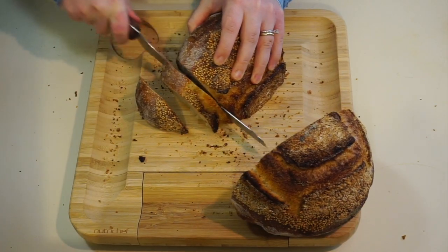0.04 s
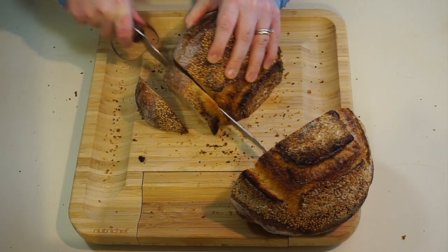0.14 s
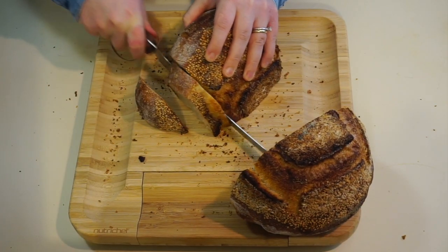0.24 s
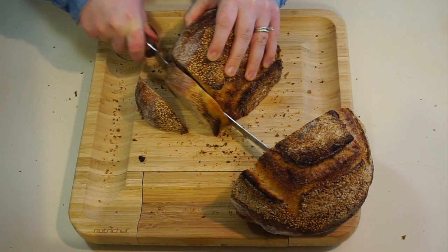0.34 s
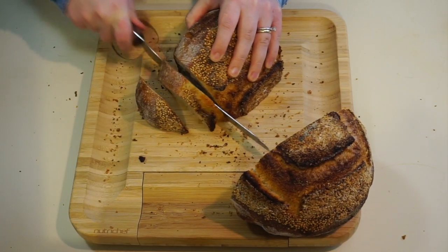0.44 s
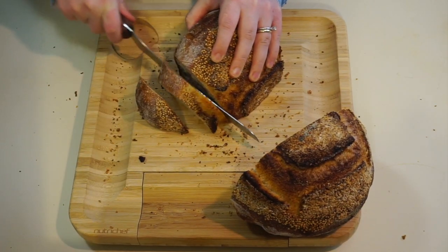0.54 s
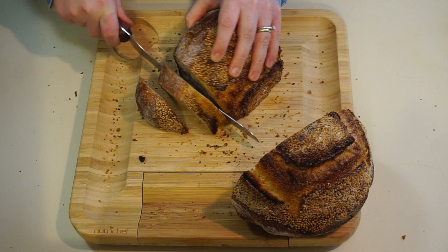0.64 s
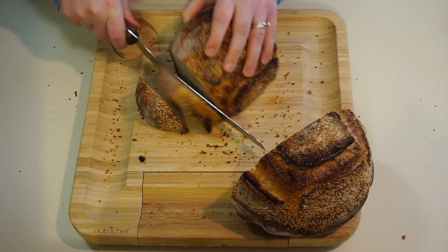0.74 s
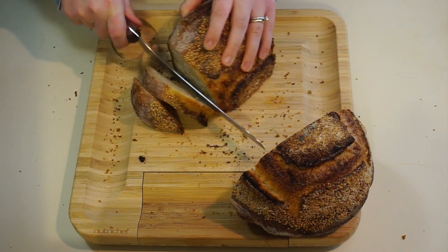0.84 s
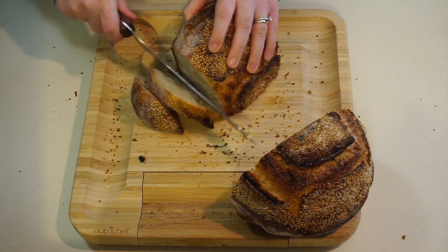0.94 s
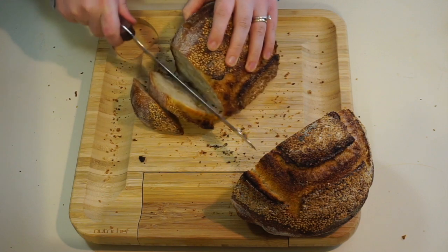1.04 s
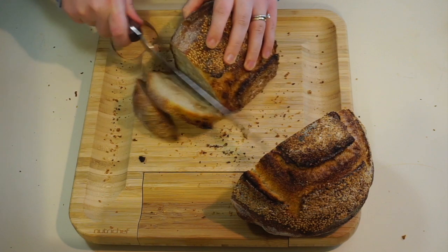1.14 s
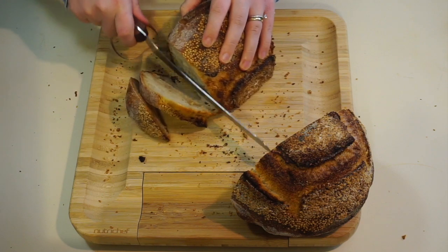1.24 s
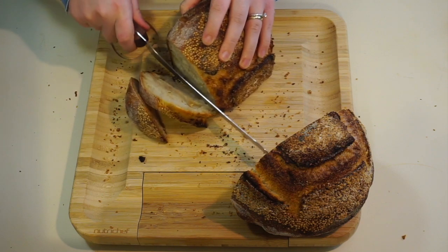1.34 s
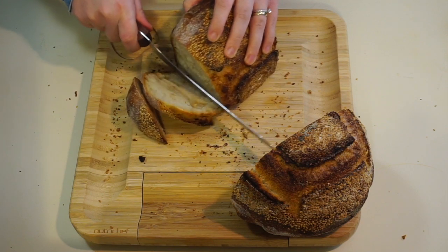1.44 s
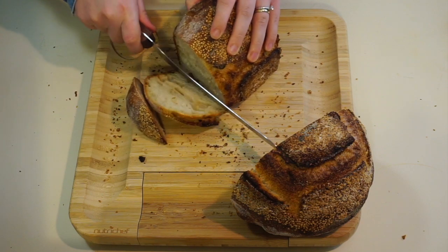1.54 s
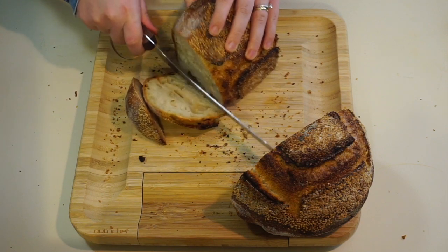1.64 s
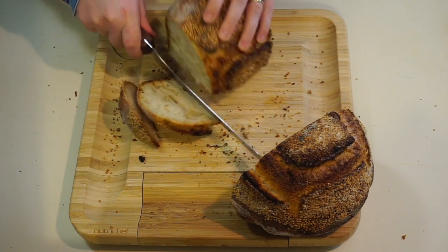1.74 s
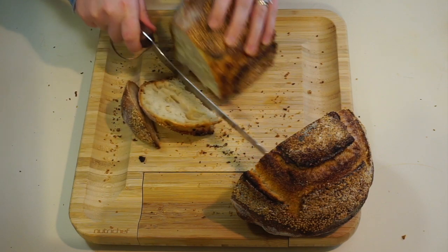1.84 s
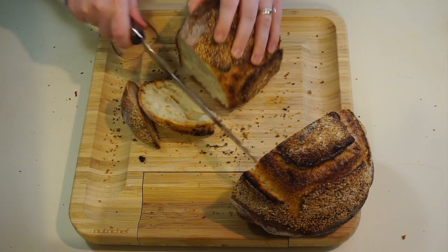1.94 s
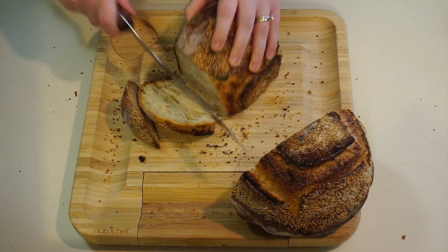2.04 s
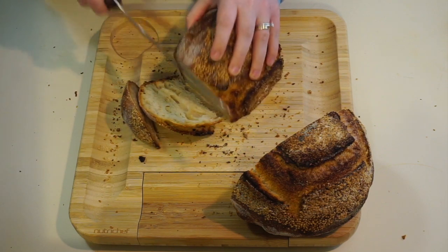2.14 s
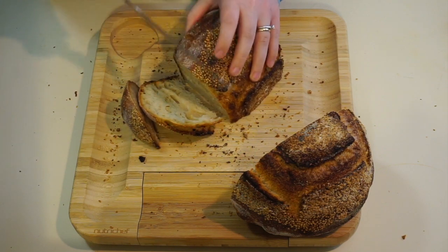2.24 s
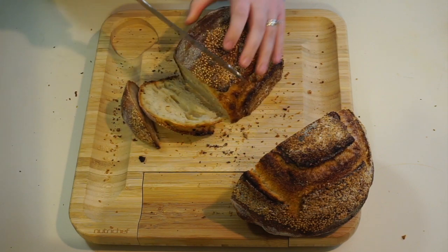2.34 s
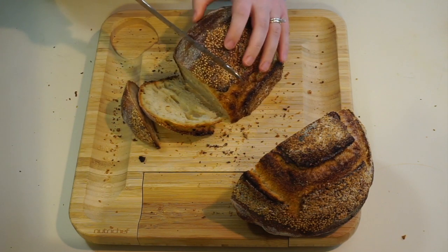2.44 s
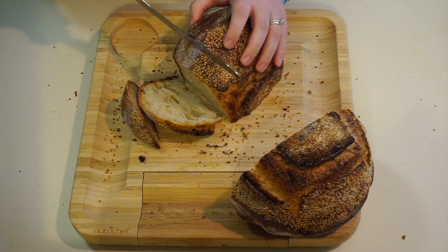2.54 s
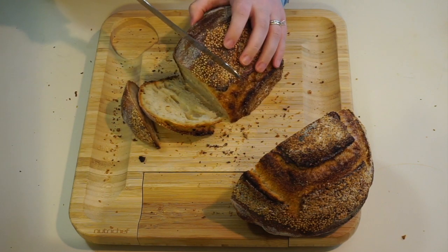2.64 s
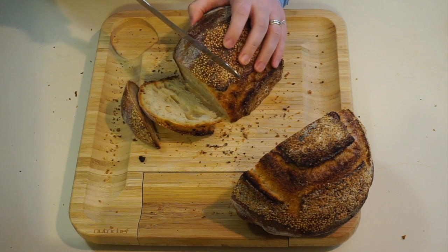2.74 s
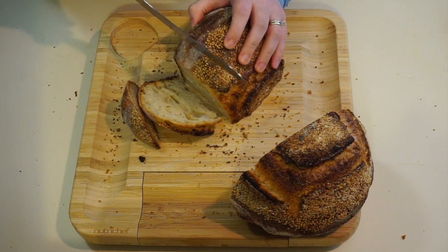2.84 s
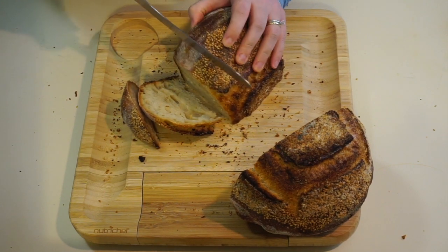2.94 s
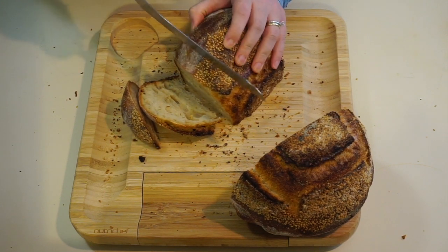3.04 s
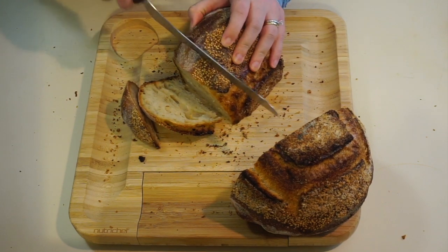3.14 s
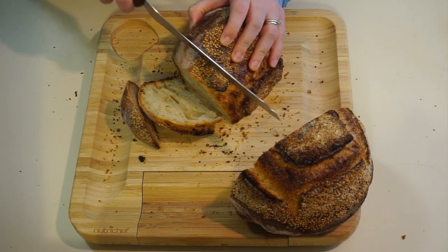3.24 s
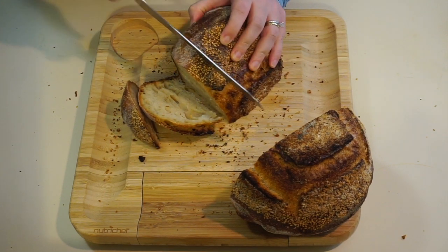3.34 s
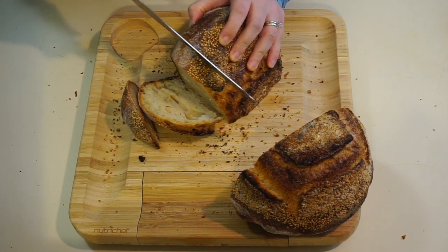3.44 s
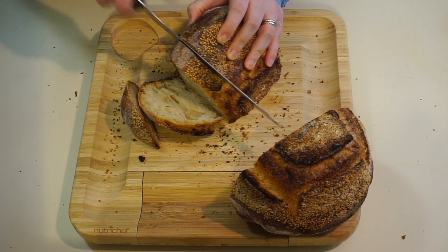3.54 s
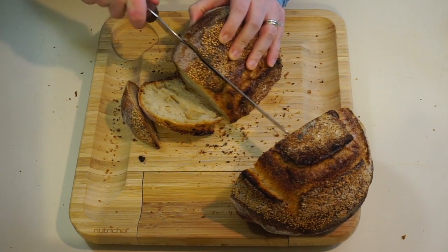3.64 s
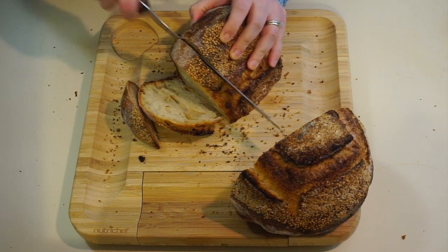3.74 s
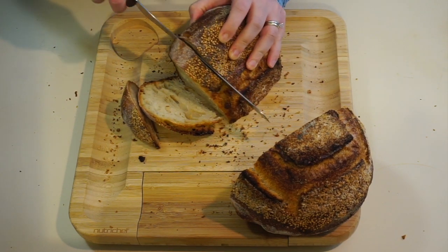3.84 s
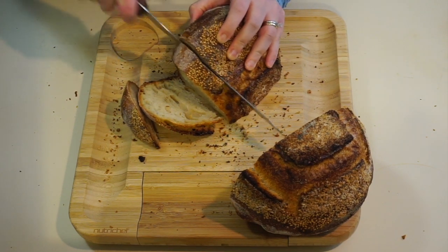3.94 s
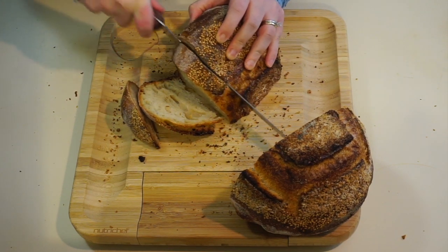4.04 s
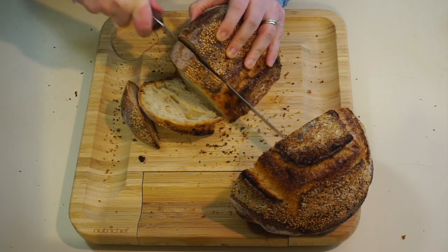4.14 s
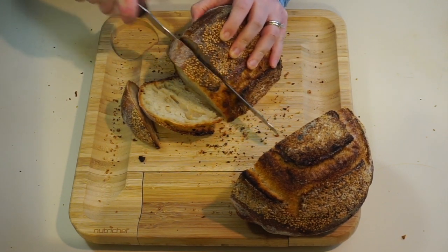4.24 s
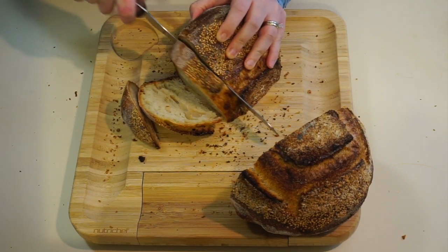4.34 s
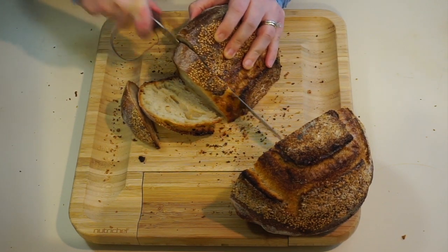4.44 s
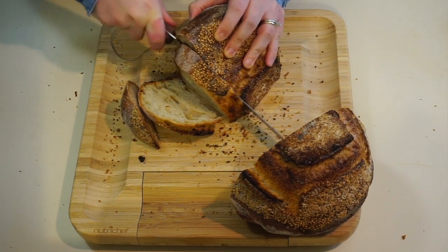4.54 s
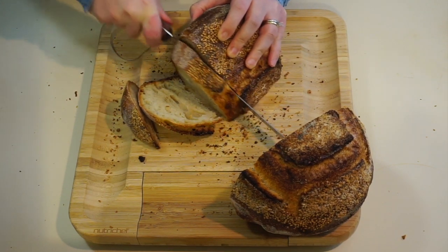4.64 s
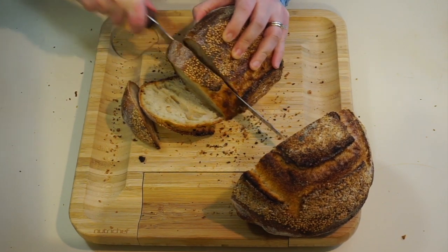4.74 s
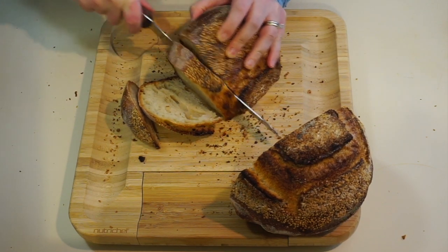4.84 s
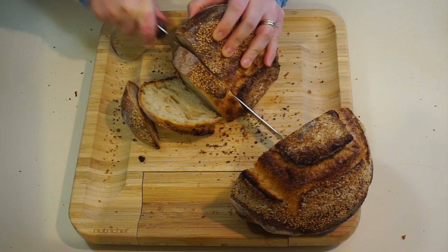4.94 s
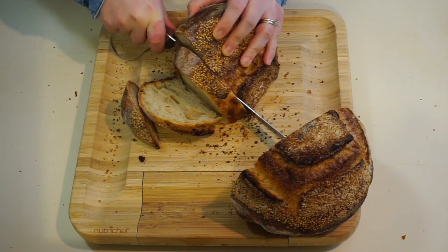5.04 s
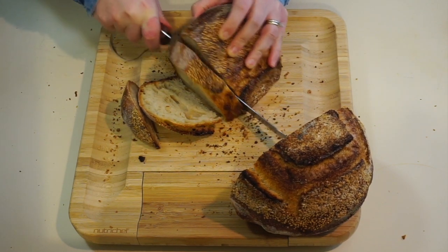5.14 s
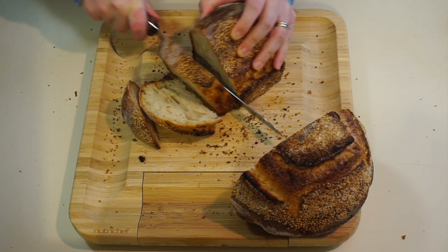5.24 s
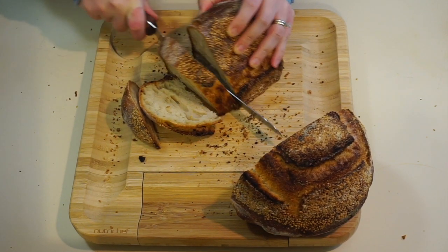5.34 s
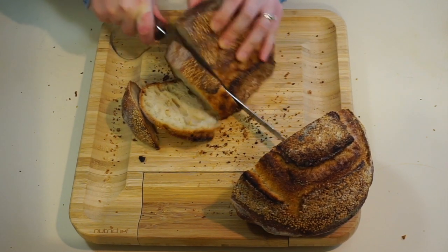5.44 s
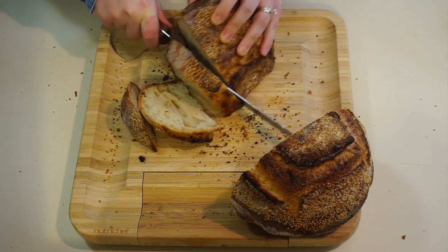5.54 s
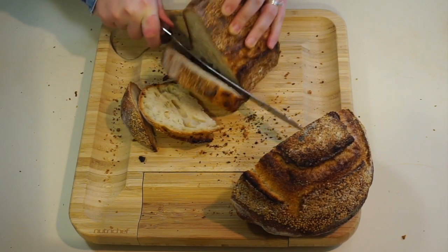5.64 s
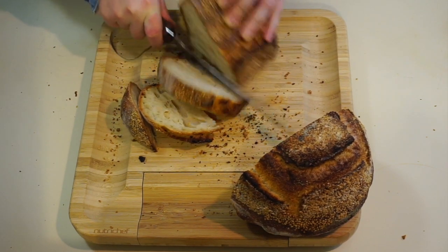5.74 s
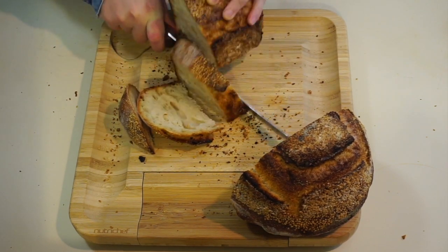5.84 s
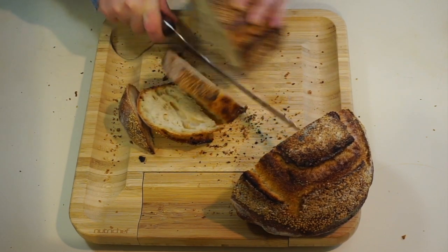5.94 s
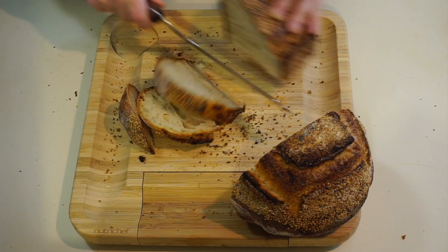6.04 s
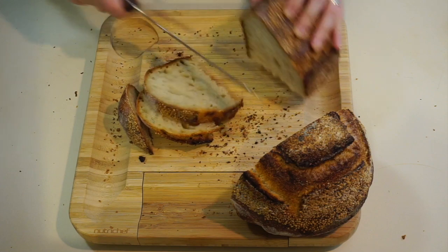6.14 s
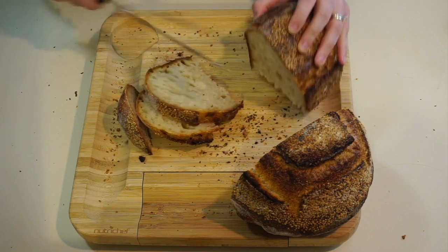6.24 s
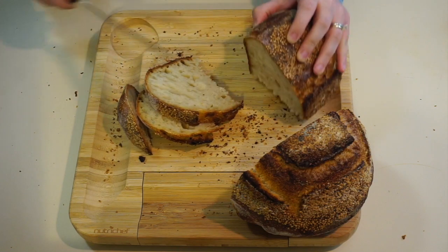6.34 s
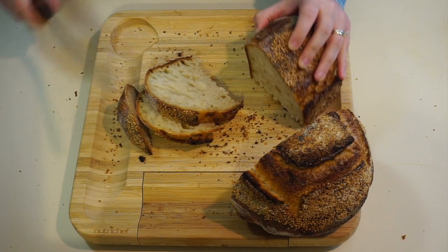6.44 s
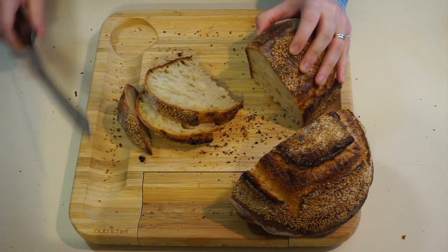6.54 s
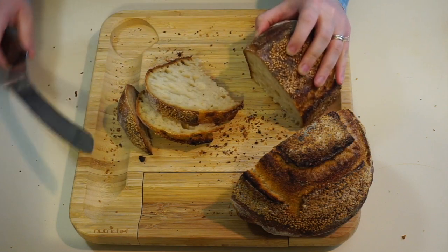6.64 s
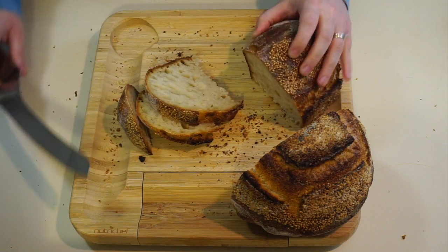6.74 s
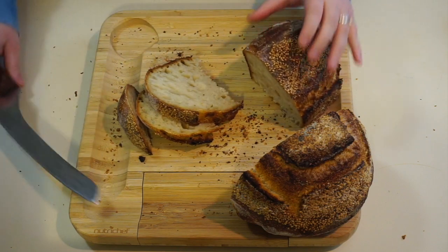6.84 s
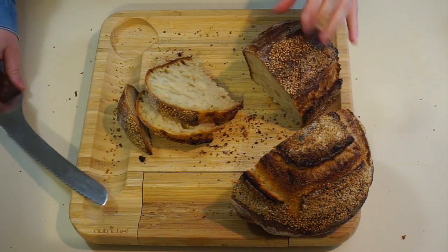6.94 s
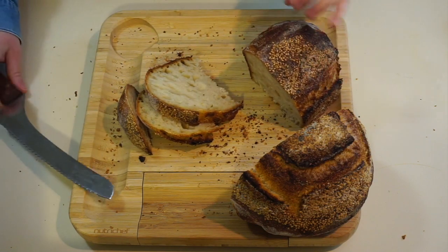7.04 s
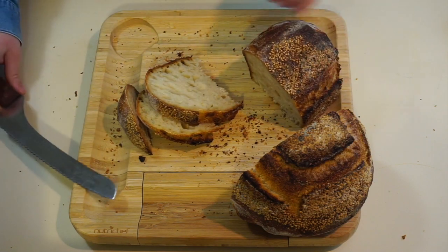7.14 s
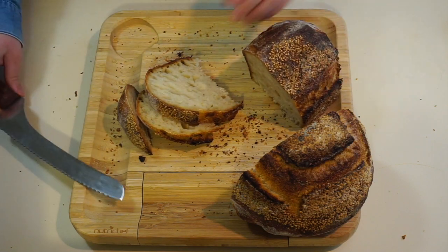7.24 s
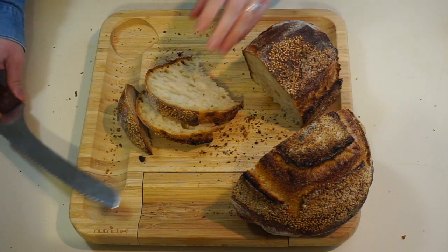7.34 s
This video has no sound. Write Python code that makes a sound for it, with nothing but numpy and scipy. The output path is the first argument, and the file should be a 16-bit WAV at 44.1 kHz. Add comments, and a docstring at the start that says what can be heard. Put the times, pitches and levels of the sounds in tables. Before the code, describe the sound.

A serrated knife rasps through a crackling bread crust on a wooden board, pauses, saws harder, then is laid down with a clatter over fridge hum.

```python
"""In a kitchen, a two-port microphone hears a serrated knife saw a crusty loaf on a wooden board.
The teeth break the crust in a swarm of tiny cracks that also shake crumb and board: shaped noise in strokes.
Single cracks are noise bursts, squeaks are short tones, and bumps ring the resonances of the board.
Slices tip over, and at the end the knife is laid down with two main knocks, ringing blade and counter.
Behind it a refrigerator hums in wavering tones over steady air noise."""
import sys
import numpy as np
from scipy import signal
from scipy.fft import rfft, irfft
from scipy.io import wavfile
from scipy.ndimage import uniform_filter1d

SR = 44100
rng = np.random.default_rng(int(sys.argv[2]) if len(sys.argv) > 2 else 0)


def store_wav(level_fs):
    """Save 16-bit WAV to argv[1]."""
    pcm = np.round(np.clip(np.atleast_2d(level_fs), -1, 1) * 32767)
    wavfile.write(sys.argv[1], SR, pcm.T.astype(np.int16))


N = 325899  # length in samples

# Dry crust close under the teeth. Each row: frequency in Hz, relative level in dB per Hz.
CRUST_SPECTRUM = [(1470, -19), (2500, -0.5), (5010, -5.5), (7260, -4), (10500, 5), (11000, -1),
                  (14300, -29), (22000, -120)]
# Soft crumb inside the loaf. Each row: frequency in Hz, relative level in dB per Hz.
CRUMB_SPECTRUM = [(700, -14.5), (1250, -3), (1570, -2), (2200, -2.5), (2600, -5.5), (4000, -13.5)]


def sawing():
    """The same breaks sound as crust crackle, crumb rasp and board rumble."""
    breaks = swarm(per_s=1100, spread_db=4, ring_s=.0005, clump_db=1)
    drag = swarm(per_s=500, spread_db=2.0, ring_s=0.0033, clump_db=0.77)  # teeth catching in the crumb
    crust = colour(breaks, lambda hz: gain_of(read(CRUST_SPECTRUM, hz)))
    crumb = colour(0.62 * breaks + 0.79 * drag, lambda hz: gain_of(read(CRUMB_SPECTRUM, hz)))
    board = colour(0.36 * breaks + 1.03 * drag, board_gain)
    crust_level, crumb_level, board_level = pressure()
    return (crust_level * shifting(crust, patchy_db=3.5)
            + crumb_level * shifting(crumb, patchy_db=3.0)
            + board_level * shifting(board, patchy_db=4.0))


# Strokes of the saw. Each row: time the teeth bite fully in seconds, swell in seconds, hold in seconds,
# level in dB, depth from 0 (top crust) to 1 (down at the board).
SAW_STROKES = [(0.0, .03, 0.0057, -37.5, 0.59), (0.136, 0.013, 0.065, -35, 0.7),
               (0.365, 0.1, 0.025, -40, 0.55), (2.764, 0.044, 0.0083, -45.5, 0.12),
               (2.866, 0.038, 0.097, -41, 0), (3.052, 0.079, 0.084, -35.5, 0.38),
               (3.296, 0.055, 0.054, -34, 0.37), (3.458, 0.033, 0.14, -34, 0.26),
               (3.718, 0.082, 0.065, -35, 0.26), (3.896, 0.068, 0.14, -31.5, 0.35),
               (4.149, 0.015, 0.099, -33, 0.46), (4.364, 0.032, 0.13, -32.5, 0.53),
               (4.725, 0.18, 0.041, -37.5, 0.6), (4.932, 0.22, 0.053, -32.5, 0.43),
               (5.133, 0.19, 0.096, -44, 0.76), (5.371, 0.071, 0.096, -45, 0.64)]
# Slices tip and tear, the hand shifts the loaf. Each row: start of the hold in seconds, swell in seconds,
# hold in seconds, level in dB, depth from 0 (dry crust) to 1 (weight on the board).
LOAF_RUSTLES = [(0.097, 0.0068, 0.027, -45, .7), (0.458, 0.086, 0.035, -51.5, 0.47),
                (0.611, 0.066, 0.15, -53, 0.64), (0.8, 0.068, 0.14, -59.5, 0.67),
                (1.05, 0.096, 0.03, -62.5, 1), (1.155, .04, 0.023, -57.5, 1),
                (1.263, .04, 0.035, -60, 0.69), (1.462, .03, 0.013, -57.5, 0.8),
                (1.656, 0.071, 0.048, -49.5, 0.8), (2.121, 0.089, 0.012, -58, 1),
                (2.375, 0.036, 0.095, -61, 0.081), (4.108, .03, .02, -51, 0.17),
                (4.595, .03, 0.0076, -45.5, 0.66), (5.51, 0.056, 0.074, -60, 0.55),
                (5.733, 0.014, 0.015, -42.5, 0.47), (5.87, 0.056, 0.079, -70, .5)]


def pressure():
    """Every stroke swells, holds in a slight arch and lets go; its depth shares it among crust, crumb and board."""
    swell_db, arch_db, release_db_per_s = 19, 2.5, 283  # rise in the swell, extra in mid hold, fall afterwards
    top_db = np.array([[1], [-7], [-7]])  # crust, crumb and board at the top crust
    deeper_db = np.array([[-11.5], [11], [9.5]])  # change of each from the top crust down to the board
    t, power = np.arange(N // 64 + 2) * 64 / SR, 0
    for s, swell_s, hold_s, db, depth in SAW_STROKES + LOAF_RUSTLES:
        arch = np.sin(np.pi * np.clip((t - s) / hold_s, 0, 1))
        rise = swell_db * np.maximum(s - t, 0) / swell_s
        fall = release_db_per_s * np.maximum(t - s - hold_s, 0)
        shape_db = db + arch_db * arch - rise - fall
        power = power + gain_of(shape_db + top_db + deeper_db * depth) ** 2
    return [np.interp(np.arange(N) / SR, t, row) for row in np.sqrt(power)]


# Resonances of the wooden board. Each row: frequency in Hz, width in Hz, relative level in dB.
BOARD_MODES = [(233, 166, -6.5), (286.6, 54, 1.5), (458, 146, -4.5), (560, 107, 1), (717.7, 69, 3.5),
               (804, 266, -1.5), (1088, 40, -10)]


def board_gain(hz):
    """The board's resonances, summed in power."""
    power = sum(gain_of(db) ** 2 / (1 + (2 * (hz - f) / width) ** 2) ** 2 for f, width, db in BOARD_MODES)
    return np.sqrt(power)


def swarm(per_s, spread_db, ring_s, clump_db):
    """Random breaks, a few large, each a short dying puff; they come in clumps."""
    struck = rng.random(N) < per_s / SR
    size = gain_of(spread_db * np.minimum(rng.exponential(1, N), 4)) * struck
    power = signal.lfilter([1], [1, -np.exp(-2 / (ring_s * SR))], size ** 2)
    clumps = evened(uniform_filter1d(uniform_filter1d(rng.standard_normal(N), 500), 500))
    return evened(np.sqrt(power) * gain_of(clump_db * clumps) * rng.standard_normal(N))


def shifting(x, patchy_db):
    """The torn surface changes under the blade, so its resonances come and go in patches."""
    z = signal.stft(x, nperseg=256)[2]
    patches = rng.standard_normal(z.shape[::-1]).T
    patches = evened(uniform_filter1d(uniform_filter1d(patches, 5, 0), 4, 1))
    return evened(signal.istft(z * gain_of(patchy_db * patches), nperseg=256)[1][:N])


# Single loud breaks of the crust. Each row: start in seconds, dry peak level in dB, centre in Hz.
CRUST_CRACKS = [(0.1033, -22, 10300), (0.111, -22, 9600), (0.1333, -13, 9600), (0.155, -13, 3000),
                (0.2372, -5, 10550), (0.3745, -25, 9200), (1.057, -36, 2740), (1.247, -26, 3980),
                (1.283, -16, 10600), (1.3195, -21.5, 10500), (1.653, -13.5, 2320), (2.7653, -16.5, 10800),
                (2.886, -8.5, 5940), (2.9354, -8.5, 8800), (2.9963, -13, 6020), (3.0787, -5.5, 3500),
                (3.264, -21, 9500), (3.2913, -11.5, 11500), (3.312, -10.5, 3660), (3.4988, -11, 11000),
                (3.5516, -2, 11300), (3.682, -8, 10600), (3.7375, -6, 2940), (3.7955, -8.5, 3000),
                (3.8686, -15.5, 10800), (3.921, -21, 9300), (4.1467, -5, 5130), (4.189, -4.5, 9500),
                (4.203, -4, 6480), (4.3465, -19, 9500), (4.357, -6, 10000), (4.413, -15, 9500),
                (4.432, -12, 2000), (4.445, -10, 10000), (4.512, -12, 8900), (4.9018, -9, 2320),
                (4.979, -28, 9300), (5.3615, -28, 2100), (5.7223, -18, 11300)]


def cracks():
    """A sharp tick, then splinters dying away, broad around the centre of the break."""
    tick_s, splinter_t60_s, splinter_share = .0005, .075, .6
    out, t, hz = np.zeros(N), np.arange(4096) / SR, np.fft.rfftfreq(4096, 1 / SR)
    fade = np.exp(-t / tick_s) + splinter_share * gain_of(-60 * t / splinter_t60_s)
    for s, db, centre_hz in CRUST_CRACKS:
        shape = 0.5 + np.exp(-(np.log((hz + 1) / centre_hz) / 0.15) ** 2)
        shape = shape * hz / (hz + 1500)  # little bass
        snap = rng.standard_normal(4096) + 4 * (t == 0)
        burst = evened(irfft(rfft(snap) * shape)) * fade
        add(out, s, gain_of(db) * burst / abs(burst).max())
    return out


# Brief squeaks of crust slipping on the blade.
# Each row: start in seconds, dry peak level in dB, mean pitch in Hz, length in seconds.
CRUST_SQUEAKS = [(0.39, -43, 3700, 0.017), (0.702, -48, 9300, 0.029), (0.937, -57.5, 4300, 0.025),
                 (1.056, -46.5, 2710, 0.01), (1.255, -53, 4030, 0.013), (1.279, -45, 4030, 0.015)]


def squeaks():
    """Each slip is a short sine tone of slightly unsteady pitch."""
    out = np.zeros(N)
    for s, db, hz, length_s in CRUST_SQUEAKS:
        count = min(round(length_s * SR), 4000)
        wander = uniform_filter1d(rng.standard_normal(4000), 90)[:count]
        turns = np.cumsum(hz * (1 + .15 * wander)) / SR
        add(out, s, gain_of(db) * np.sin(2 * np.pi * turns) * signal.windows.tukey(count, .5))
    return out


# The blade or a slice bumps the board. Each row: start in seconds, dry peak level in dB, dullness from 0 to 1.
BOARD_BUMPS = [(0.102, -30.5, 0.36), (0.1333, -24, 0.65), (0.375, -21, 0.6), (0.53, -41.5, 0.4),
               (0.608, -33, 0.2), (0.63, -40, 0), (0.655, -31.5, 0.44), (0.76, -49, .1), (0.835, -44, 0.2),
               (1.088, -39.5, 0.05), (1.157, -40.5, 0.75), (1.28, -37.5, 0.66), (1.52, -51, 0.4),
               (1.572, -47, 0), (1.805, -44.5, 0.06), (2.123, -34.5, 0.46), (2.885, -25, 0.57),
               (3.461, -33, 0.47), (3.023, -26, 0.9), (3.99, -17, 0.14), (4.299, -26.5, 0.73),
               (4.732, -20, 0.7), (4.749, -17.5, 0.04), (4.8231, -13, 0.46), (4.839, -19.5, 0),
               (4.965, -24, 0.06), (5.179, -23, 0.68), (5.419, -25, 0.44)]


def bumps():
    """An uneven push rings the board; a duller push lasts longer and favours the low modes."""
    tap_db_per_octave, scuff_s = 9, .004
    out, t = np.zeros(N), np.arange(4096) / SR
    for s, db, dull in BOARD_BUMPS:
        dull = np.clip(dull, 0, 1)
        lean_db = tap_db_per_octave * (1 - 2 * dull)  # a light tap hardly moves the low modes
        ring = 0
        for f, width, mode_db in BOARD_MODES:
            level = gain_of(mode_db + lean_db * np.log2(f / 500))
            ring = ring + level * np.exp(-.7 * np.pi * width * t) * np.sin(2 * np.pi * f * t)
        push_s = 0.000092 * gain_of(15.8 * dull)
        push = t / push_s * np.exp(-t / push_s)
        grit = rng.standard_normal(4096) * np.exp(-t / scuff_s)
        scuff = signal.oaconvolve(grit, push)[:len(t)]
        sound = signal.oaconvolve(evened(push) + 1.16 * evened(scuff), ring)[:len(t)]
        add(out, s, gain_of(db) * sound / abs(sound).max())
    return out


# Ringing of the blade. Each row: frequency in Hz, relative level in dB, time to fall 60 dB in seconds.
BLADE_MODES = [(730, 7, 0.08), (1490, 4.5, 0.095), (1578, 6, 0.055), (1720, 4, 0.031), (1920, 3.5, 0.024),
               (2490, -19, 0.17), (3100, -12, 0.16)]
# Ringing of the counter. Each row: frequency in Hz, relative level in dB, time to fall 60 dB in seconds.
COUNTER_MODES = [(268, -3, 0.031), (458, -4.5, 0.16), (583, -5, 0.1), (774, -0.5, 0.11), (856, 0, 0.073),
                 (1076, -3.5, 0.098), (1361, -3, 0.063), (1660, -8, 0.056), (1992, -6, 0.03),
                 (2214, -3, 0.037), (2780, -29, 0.051), (3286, -15, 0.12)]
# Dense small modes of the wood. Each row: frequency in Hz, relative level in dB per Hz.
CLATTER_SPECTRUM = [(80, -22), (200, -4.5), (600, -8.5), (2000, 2.5), (3000, -6), (4500, -17.5),
                    (7000, -29), (11000, -36.5)]
# The knife strikes the wood once after the last cut, then is laid down and rattles. Each row: start in seconds,
# dry peak level in dB, share of blade against counter from 0 to 1, length of the contact in seconds.
KNIFE_KNOCKS = [(5.733, -26.5, .05, 0.0022), (6.8777, -12.5, .85, 0.005), (6.924, -21, .7, 0.015),
                (6.946, -26, .9, 0.005), (7.016, -7.5, .1, 0.0015), (7.028, -18.5, .1, 0.002),
                (7.041, -20.5, .05, 0.004), (7.095, -34, .2, 0.01), (7.165, -34.5, .9, 0.0025)]


def ringing(modes, t):
    """Sum of dying sine modes."""
    return sum(gain_of(db - 60 * t / t60) * np.sin(2 * np.pi * f * t + k)
               for k, (f, db, t60) in enumerate(modes))


def knocks():
    """Each contact is a short rattle that rings blade and counter, over a woody clatter."""
    out, t = np.zeros(N), np.arange(12000) / SR
    blade, counter = ringing(BLADE_MODES, t), ringing(COUNTER_MODES, t)
    for s, db, share, contact_s in KNIFE_KNOCKS:
        share = np.clip(share, 0, 1)
        grit = rng.standard_normal(len(t))
        rattle = (0.043 * grit + (t == 0)) * np.exp(-t / max(contact_s, .0005))
        ring = evened(signal.oaconvolve(rattle, share * blade + (1 - share) * counter)[:len(t)])
        puff = grit * np.exp(-t / 0.016) * (1 - np.exp(-t / 0.00027))
        clatter = evened(colour(puff, lambda hz: gain_of(read(CLATTER_SPECTRUM, hz))))
        sound = ring + gain_of(-2 - 1.4 * share) * clatter  # the light blade rattles the wood less
        add(out, s, gain_of(db) * sound / abs(sound).max())
    return out


# Tones of the refrigerator. Each row: frequency in Hz, rms level in dB about which it wavers.
FRIDGE_TONES = [(118, -80.5), (236.9, -58), (296.1, -70.5), (651.4, -71.5), (1362, -73.5), (2008, -71.5),
                (2067, -72), (2837, -74), (5023, -76), (5911, -71), (6616, -71), (8802, -78), (10045, -78)]


def refrigerator():
    """Compressor tones that waver a little, each at its own phase in each port."""
    t, out = np.arange(N) / SR, np.zeros((2, N))
    for hz, db in FRIDGE_TONES:
        slow = evened(uniform_filter1d(rng.standard_normal((2, N // 441 + 2)), 6))  # 100 points a second
        level, drift = (np.interp(t, np.arange(len(v)) / 100, v) for v in slow)
        turns = hz * t + 0.00077 * hz ** .5 * np.cumsum(drift) / 441 + rng.random()
        apart = np.arccos(np.clip(read(PORT_LIKENESS, hz), -1, 1))
        out += np.sqrt(2) * gain_of(db + 0.74 * level) * np.sin(2 * np.pi * turns + [[0], [apart]])
    return out


# Steady noise at the microphone. Each row: frequency in Hz, relative level in dB per Hz.
AIR_SPECTRUM = [(15, -78), (25, -54), (178, -16.5), (235, -5.5), (422, -11), (1710, -17), (2050, -18),
                (2580, -22), (5820, -21), (11000, -24.5), (14300, -84), (22000, -120)]
# How alike the background is in the two ports. Each row: frequency in Hz, left-right likeness from -1 to 1.
PORT_LIKENESS = [(60, -0.071), (220, 1), (840, -0.38), (3120, 0.05), (11600, 0.069)]


def air():
    """Steady kitchen noise and microphone hiss, slightly patchy."""
    air_db = -55.5  # rms
    frames, hz = N // 256 + 5, np.fft.rfftfreq(1024, 1 / SR)
    a, b, c, d, patches = rng.standard_normal((frames, 513, 5)).T
    patches = evened(uniform_filter1d(uniform_filter1d(patches, 12, 0), 14, 1))
    same = np.clip(read(PORT_LIKENESS, hz), -1, 1)[:, None]
    left, other = a + 1j * b, c + 1j * d
    z = np.array([left, same * left + np.sqrt(1 - same ** 2) * other])
    z *= gain_of(read(AIR_SPECTRUM, hz)[:, None] + 1.6 * patches)
    return gain_of(air_db) * evened(signal.istft(z, nperseg=1024, noverlap=768)[1][:, :N])


# Echo of the kitchen. Each row: frequency in Hz, time to fall 60 dB in seconds.
KITCHEN_T60 = [(150, 0.36), (500, 0.44), (2000, 0.23), (5000, 0.29), (11000, 0.14)]
# Spread between the ports. Each row: frequency in Hz, gain of the side reflections in dB.
SIDE_GAIN = [(100, -28), (350, -22.5), (840, -13.5), (2000, -9.5), (4800, -4.5), (8000, -7), (11600, -3)]
# Lean of the mid towards one port. Each row: frequency in Hz, left minus right in dB.
PORT_TILT = [(1000, -0.1), (2500, -0.6), (4800, 2.5), (9000, 1.3), (11600, 2.5)]


def ports(x):
    """Direct sound and kitchen echo form the mid; near reflections differ between the ports, more so in the treble."""
    right_late_s = .00002

    def kitchen():
        return tail(lambda hz: read(KITCHEN_T60, hz))

    echo = reflect(x, lambda: np.concatenate([np.zeros(300), kitchen()]))  # 300 samples late
    side = reflect(x, lambda: tail(lambda hz: np.full_like(hz, .02)) + kitchen())
    hz = np.fft.rfftfreq(N, 1 / SR)
    mid = rfft(x + gain_of(-7) * echo)
    side = rfft(side) * gain_of(read(SIDE_GAIN, hz))
    lean = gain_of(read(PORT_TILT, hz) / 2) * np.exp(1j * np.pi * hz * right_late_s)
    return irfft([(mid + side) * lean, (mid - side) / lean], N)


def reflect(x, make_tail):
    """The source moves, so three sets of reflections take turns."""
    turns, out = np.arange(N) / SR * 2.3, 0
    for k in range(3):
        share = np.sqrt(2 / 3) * np.cos(2 * np.pi * (turns + k / 3))
        out = out + signal.oaconvolve(x * share, make_tail())[:N]
    return out


def tail(t60):
    """Random reflections, each band dying with its own t60(hz); energy 1."""
    hz, t, z = signal.stft(rng.standard_normal(SR // 2), SR, nperseg=128)
    taps = signal.istft(z * gain_of(-60 * t / t60(hz)[:, None]), SR, nperseg=128)[1]
    return taps / np.linalg.norm(taps)


def gain_of(db):
    """Decibels to a factor."""
    return 10 ** (np.asarray(db) / 20)


def evened(x):
    """Scales to rms 1."""
    return x / np.sqrt(np.mean(x ** 2) + 1e-20)


def read(points, hz):
    """Reads a table of values on a log-frequency axis."""
    f, value = np.transpose(points)
    return np.interp(np.log(hz + 1), np.log(f + 1), value)


def add(mix, s, sound):
    """Adds a sound at time s in seconds."""
    part = mix[round(s * SR):][:len(sound)]
    part += sound[:len(part)]


def colour(x, gain):
    """Causal (minimum-phase) filter whose gain at each frequency is gain(hz)."""
    log_gain = np.log(np.maximum(gain(abs(np.fft.fftfreq(4096, 1 / SR))), 1e-5))
    taps = np.fft.ifft(np.exp(np.conj(signal.hilbert(log_gain)))).real[:2048]
    return signal.oaconvolve(x, taps)[..., :x.shape[-1]]


def scene():
    """Everything on the board reaches the ports through the kitchen, with its bass thinned below about 150 Hz."""
    board = sawing() + cracks() + squeaks() + bumps() + knocks()
    board = signal.sosfilt(signal.butter(2, 150, "high", fs=SR, output="sos"), board)
    return ports(board) + refrigerator() + air()


def record(dry):
    """The recorder's band limit: a steep low-pass at 11180 Hz."""
    taps = signal.firwin(401, 11180, window=("kaiser", 8), fs=SR)
    return signal.oaconvolve(dry, taps[None], "same")


dry = scene()
out = record(dry)
store_wav(out)
```